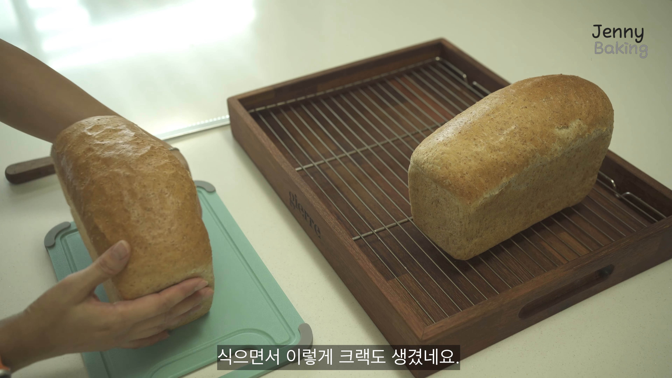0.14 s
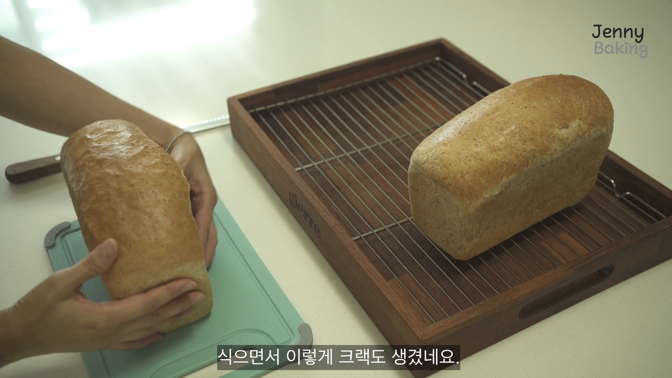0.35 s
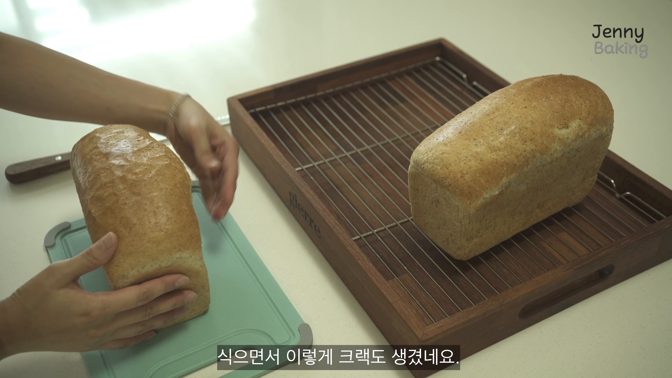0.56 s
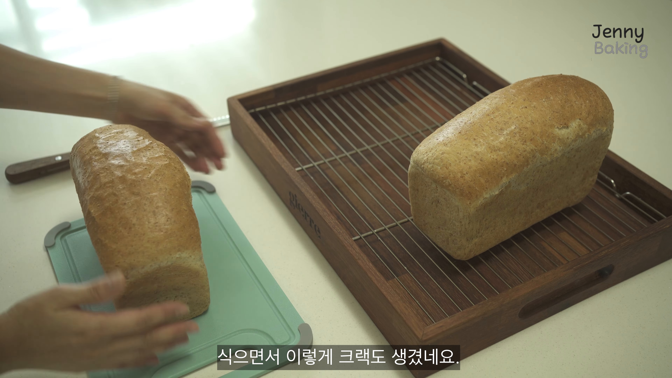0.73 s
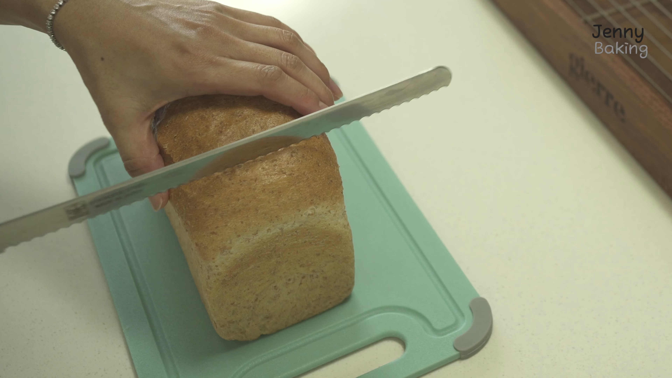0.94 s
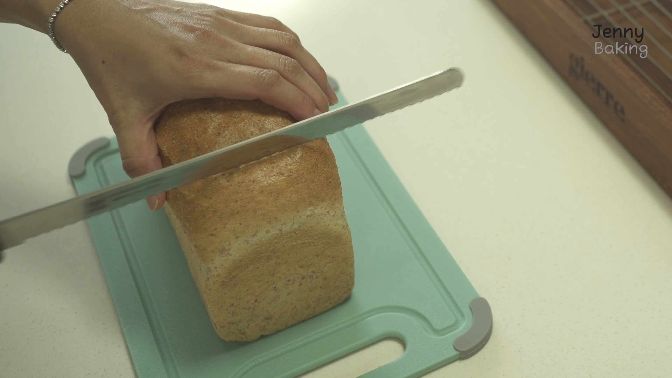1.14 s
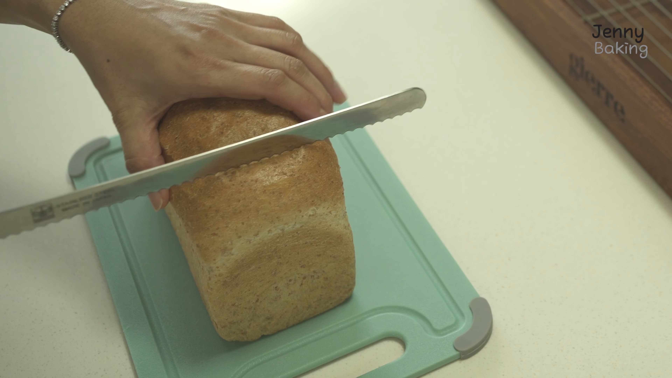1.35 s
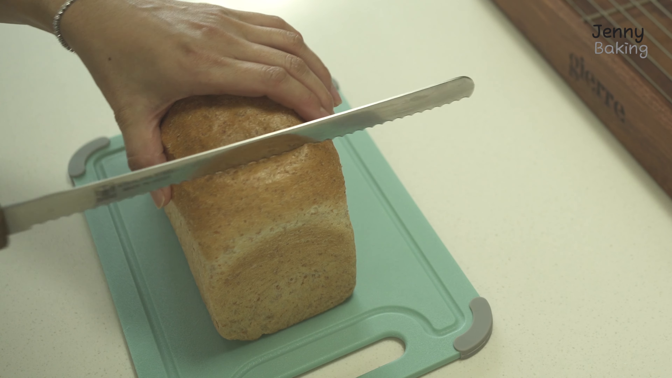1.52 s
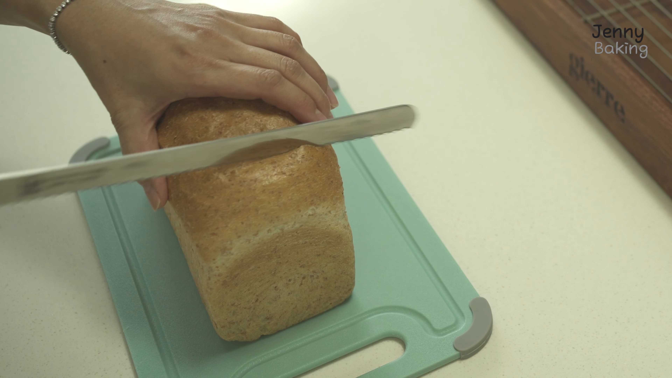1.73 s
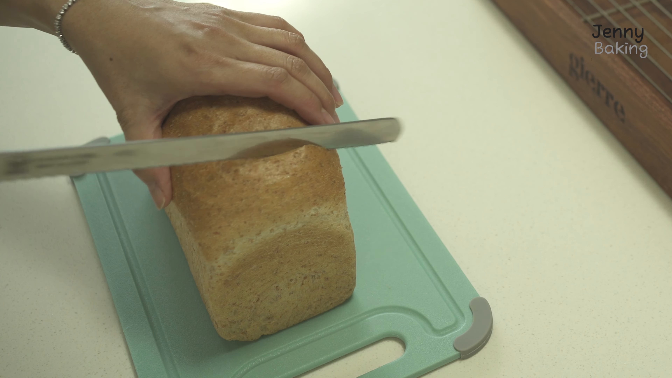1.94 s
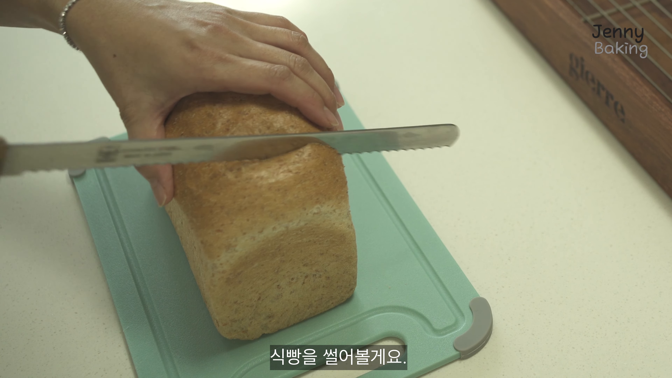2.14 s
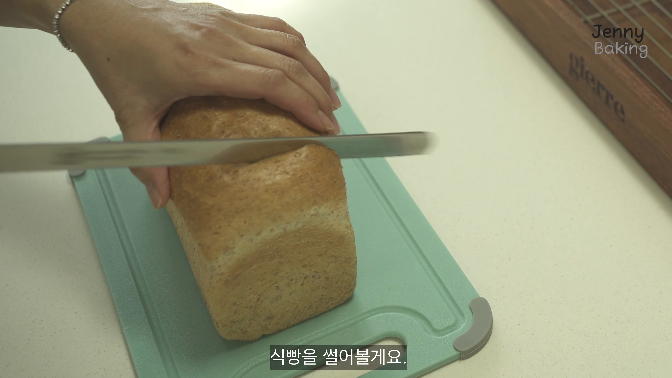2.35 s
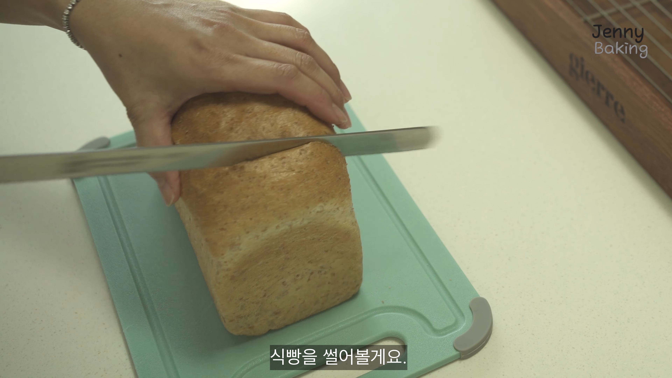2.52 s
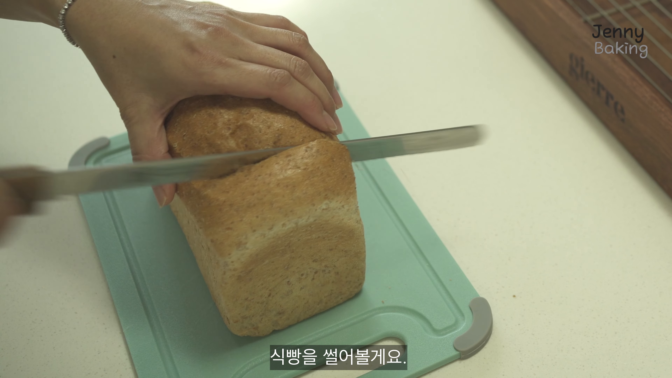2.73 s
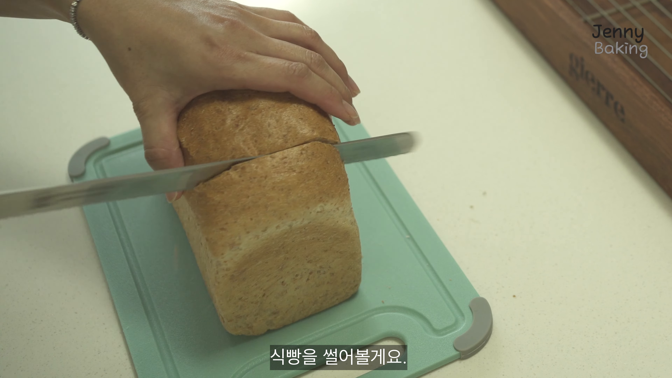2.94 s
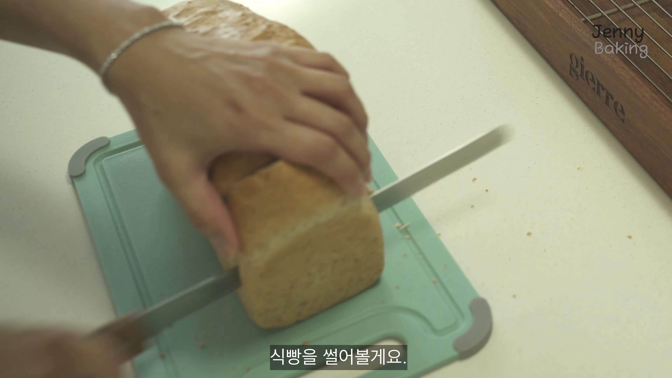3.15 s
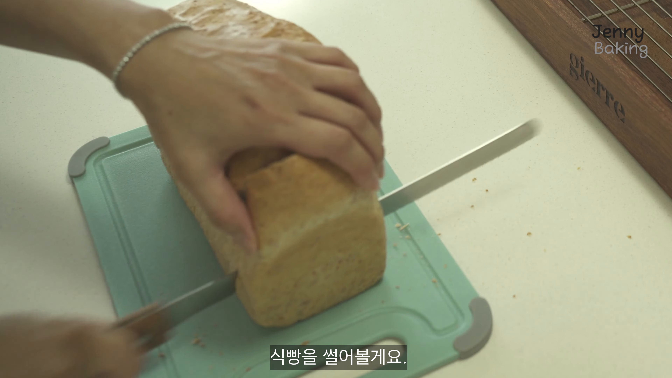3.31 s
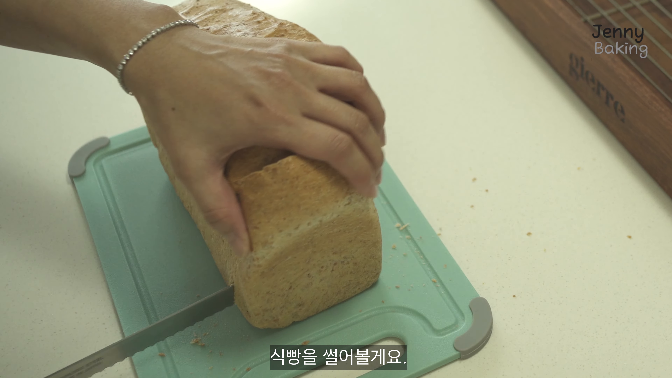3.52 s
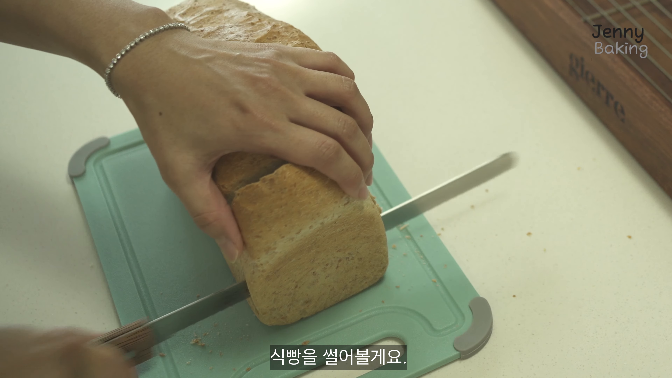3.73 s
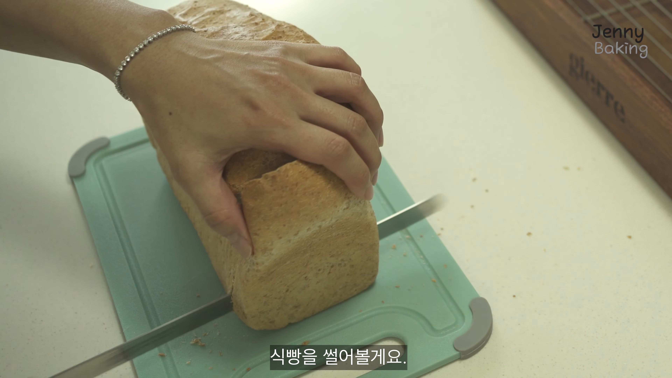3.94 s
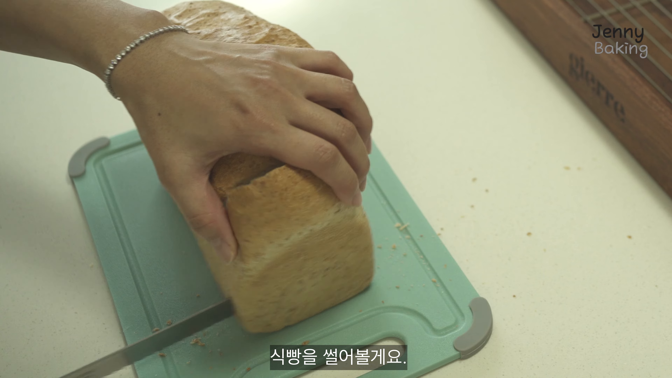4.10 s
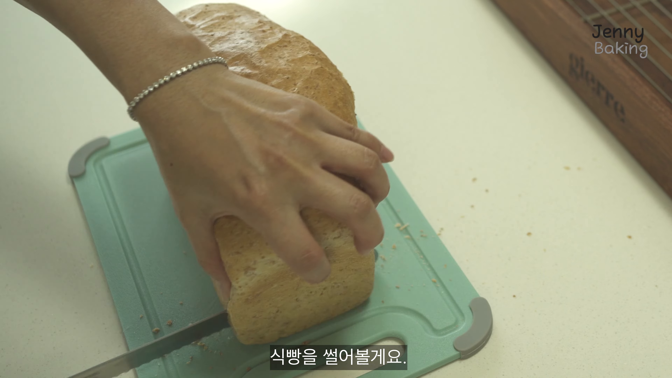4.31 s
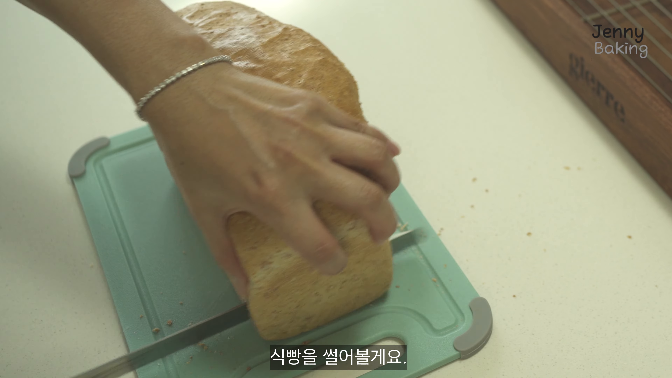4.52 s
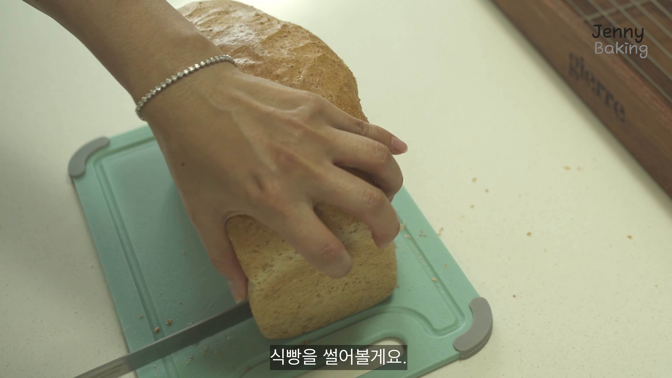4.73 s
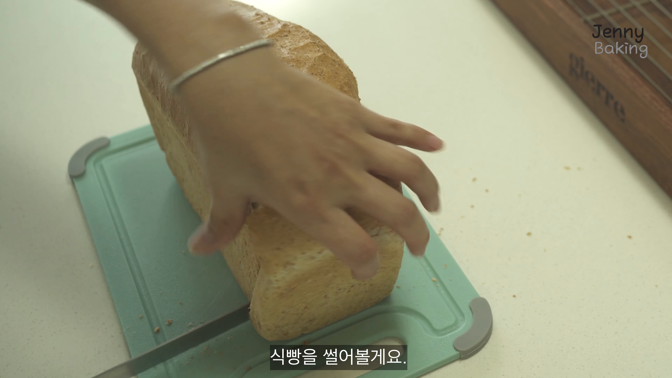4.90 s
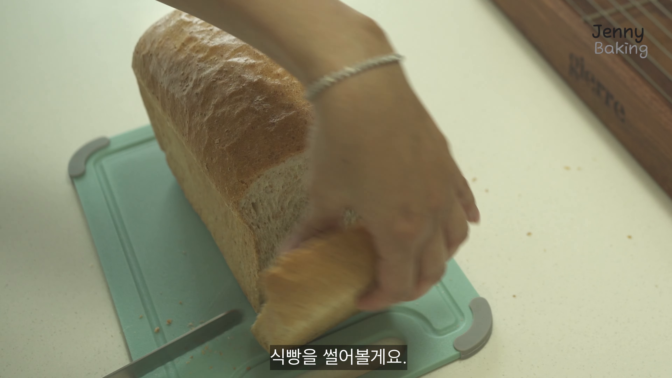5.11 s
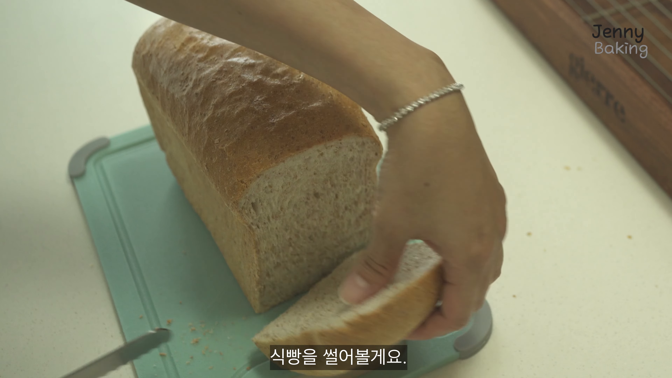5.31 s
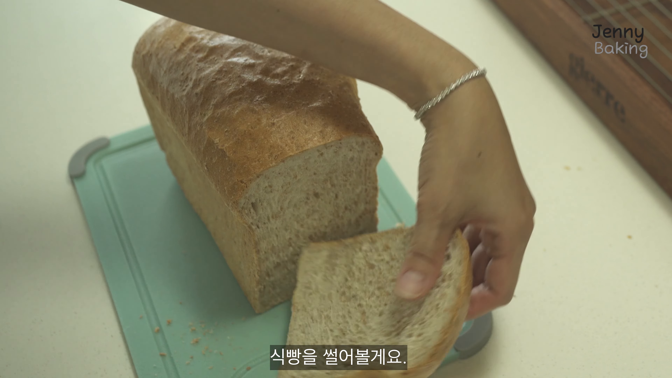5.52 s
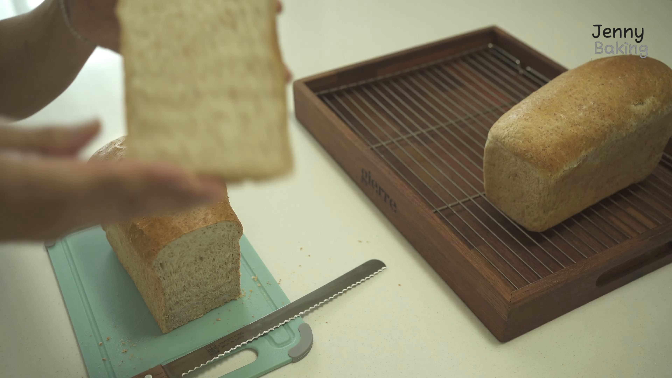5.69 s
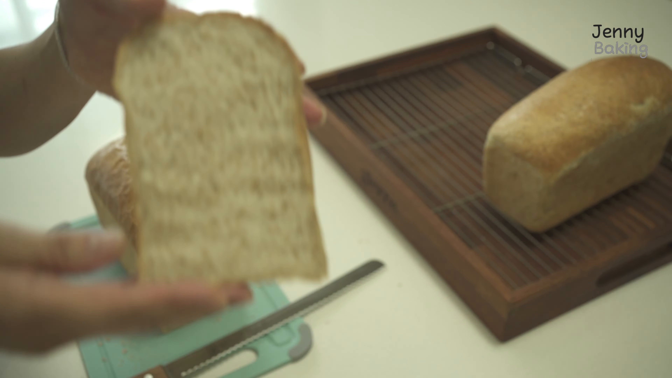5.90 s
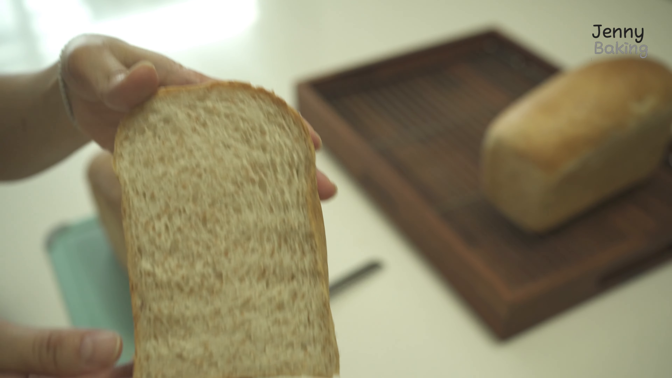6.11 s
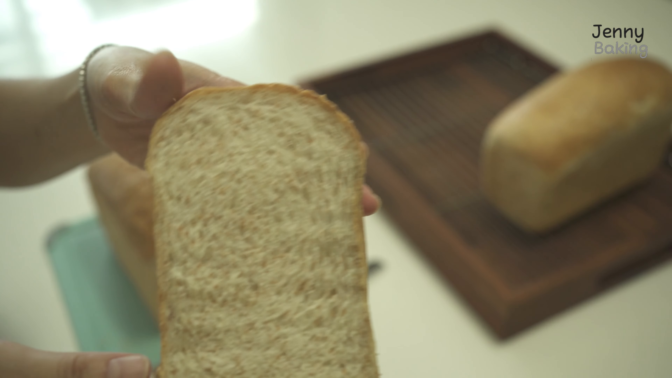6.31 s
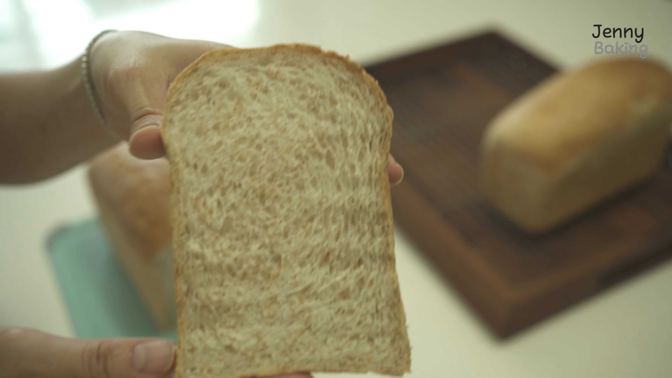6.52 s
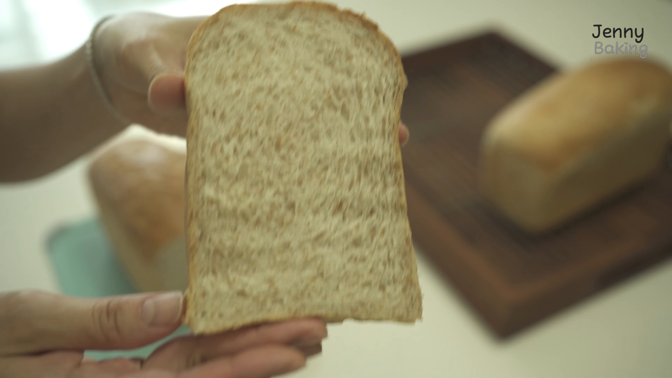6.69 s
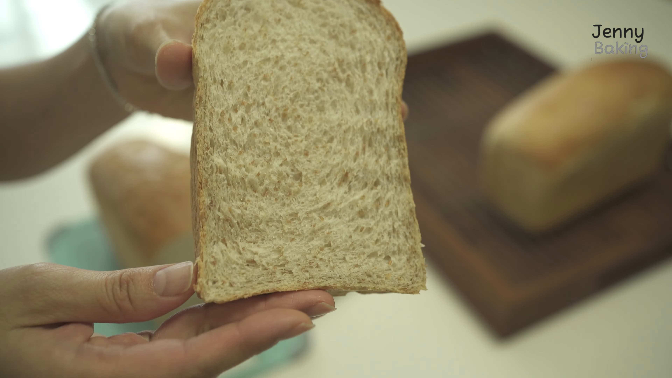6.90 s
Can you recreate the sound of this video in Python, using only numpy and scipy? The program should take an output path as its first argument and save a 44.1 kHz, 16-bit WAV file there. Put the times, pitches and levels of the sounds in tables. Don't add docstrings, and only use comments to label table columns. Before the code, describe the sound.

In a small kitchen with low hum and hiss, hands rustle on crust and a loaf lands on a plastic board with one dull, strong thud. A serrated knife then saws back and forth quickly, raspy and crackling, with sharp crust snaps. Strokes grow longer and duller in the crumb. The background suddenly drops away, faint scrapes finish the cut, then the hum returns with light slice handling. Close microphone, short room tail.

```python
import sys
import numpy as np
from scipy import signal
from scipy.fft import rfft, irfft
from scipy.io import wavfile
from scipy.ndimage import uniform_filter1d

SR = 44100
rng = np.random.default_rng(int(sys.argv[2]) if len(sys.argv) > 2 else 0)


def generate_wav(sig):
    pcm = np.round(np.clip(np.atleast_2d(sig).T, -1, 1) * 32767).astype(np.int16)
    wavfile.write(sys.argv[1], SR, pcm)


def magnitude_from_level(level_db):
    exponent = np.asarray(level_db, float) / 20
    return 10 ** exponent


N = 306495


def rms_one(x):
    return x / np.sqrt(np.mean(x ** 2) + 1e-20)


def add(out, start, x):
    x = x[:N - start]
    out[start:start + len(x)] += x


def drift(size, rate_hz):
    r = np.exp(-2 * np.pi * rate_hz / SR)
    slow = signal.lfilter([1], [1, -2 * r, r * r], rng.standard_normal(size + 4000))
    return rms_one(slow[4000:])


def colour(x, tone, peaks):
    hz = np.linspace(1, SR / 2, 4097)
    tone_hz, tone_db = np.transpose(tone)
    db = np.interp(np.log(hz), np.log(tone_hz), tone_db)
    db = db + sum(peak_db / (1 + (2 * (hz - f) / width) ** 2) for f, width, peak_db in peaks)
    cepstrum = irfft(np.log(magnitude_from_level(db)))
    cepstrum[1:4096] *= 2
    cepstrum[4097:] = 0
    impulse = irfft(np.exp(rfft(cepstrum)))[:4096]
    return signal.fftconvolve(x, impulse)[:len(x)]


def band(x, low_hz, high_hz):
    edges_hz = [low_hz, min(high_hz, .45 * SR)]
    return signal.sosfilt(signal.butter(2, edges_hz, "band", fs=SR, output="sos"), x)


def grains(size, per_s, spread_db):
    sizes = magnitude_from_level(spread_db * np.minimum(rng.exponential(1, size), 4))
    sizes = sizes * rng.choice([-1, 1], size)
    return rms_one(sizes * (rng.random(size) < per_s / SR))


def friction(out, motion, tone, peaks, split_hz, teeth_per_s, uneven_db, bite, crackle, patchy_db):
    start, (body_db, blade_db, crackle_db) = motion
    size = len(body_db)

    speed = magnitude_from_level(np.maximum(.2 * (body_db - np.max(body_db)), -4))
    teeth_passed = np.cumsum(teeth_per_s * speed * magnitude_from_level(uneven_db * drift(size, 70))) / SR
    catch = np.diff(np.floor(teeth_passed), prepend=0) * magnitude_from_level(2.56 * rng.standard_normal(size))

    burst_decay = np.exp(-1 / (.003 * SR))
    share = np.clip(bite, 0, 1)
    bursts = rms_one(signal.lfilter([1], [1, -burst_decay], catch))
    gate = (1 - share + share * bursts) * magnitude_from_level(patchy_db * drift(size, 27))
    tearing = rms_one(rng.standard_normal(size) * gate)
    knock = tearing + share * rms_one(catch)
    crumbs = tearing + crackle * grains(size, 700, 3.4) * gate

    low_hz, high_hz = split_hz
    body = band(colour(knock, tone, peaks), 90, low_hz)
    blade = -band(colour(knock + crumbs, tone, peaks), low_hz, high_hz)
    hiss = -band(band(colour(crumbs, tone, peaks), high_hz, 19000), .8 * high_hz, 19000)
    hiss = hiss + band(hiss, 2700, 6800) * (magnitude_from_level(2.18 * drift(size, 8.1)) - 1)

    mix = magnitude_from_level(body_db) * rms_one(body)
    mix = mix + magnitude_from_level(blade_db) * rms_one(blade)
    mix = mix + magnitude_from_level(crackle_db) * rms_one(hiss)
    add(out, start, mix)


def layers(weight, rub, share, lift_db):
    weight_db, rub_db = 20 * np.log10(weight), 20 * np.log10(rub)
    blade_db = share * rub_db + (1 - share) * weight_db + lift_db
    return weight_db, blade_db, rub_db


def strokes(rows, feel, end_s):
    bite, let_go, keen, share, lift_db, sink_db_per_s, rest_push_db, rest_tear_db = feel
    start = round(rows[0][0] * SR)
    t = np.arange(start, round(end_s * SR)) / SR
    push_power, tear_power = magnitude_from_level(rest_push_db) ** 2, magnitude_from_level(rest_tear_db) ** 2
    for s, length, before, push_db, tear_db in rows:
        phase = np.interp(t, [s, s + before * length, s + length], [0, np.pi / 2, np.pi])
        speed = np.abs(np.sin(phase)) ** np.where(phase < np.pi / 2, bite, let_go)
        push_power = push_power + (magnitude_from_level(push_db) * speed) ** 2
        tear_power = tear_power + (magnitude_from_level(tear_db) * speed ** keen) ** 2
    blade_lift_db = lift_db + sink_db_per_s * (t - t[0])
    return start, layers(np.sqrt(push_power), np.sqrt(tear_power), share, blade_lift_db)


# [t/s, length/s, share before fastest point, push level/dB, tearing level/dB]
CRUST_STROKES = [(.966, .1, 0.11, -51, -55), (1.12, .14, 0.47, -39.5, -44),
                 (1.265, 0.15, 0.5, -37.5, -40.5), (1.435, 0.15, 0.51, -32.5, -40.5),
                 (1.58, .17, 0.37, -37, -40), (1.755, .15, 0.56, -33.5, -44.5),
                 (1.89, .16, 0.39, -43, -42.5), (2.055, .14, 0.64, -30, -40), (2.19, 0.16, .52, -36.5, -39),
                 (2.335, .19, 0.52, -32.5, -37), (2.46, .215, 0.53, -39, -45.5),
                 (2.68, 0.2, 0.41, -35, -34), (2.81, .3, 0.6, -37.5, -42.5)]
CRUMB_STROKES = [
    (3.014, .1, .3, -43, -51.5),
    (3.05, .29, .48, -32.5, -48),
    (3.352, .27, .47, -29, -39.5),
    (3.58, .285, 0.51, -35.5, -43.5),
    (3.865, .28, .45, -37.5, -41),
    (4.145, 0.24, .38, -41, -42.5),
]
BASE_STROKES = [
    (4.375, 0.11, .6, -68, -58),
    (4.428, 0.17, 0.15, -59, -46.5),
    (4.53, .23, .45, -52.5, -48.5),
    (4.7, .21, .36, -55.5, -52.5),
    (4.85, 0.49, 0.17, -56, -53.5),
]
# [bite power, let-go power, tearing power, tearing share of blade, blade lift/dB,
# lift change/(dB/s), resting push/dB, resting tearing/dB]
CRUST_FEEL = (1.13, 1.56, 1.0, 0.93, 4.5, -2.5, -55, -68)
CRUMB_FEEL = (1.0, 1.38, 0.67, 0.62, -5.5, 5.5, -53, -68.5)
BASE_FEEL = (0.78, 2.5, 1.8, 0.58, 5.5, 5, -90.5, -99)
# [f/Hz, level/(dB per Hz)]
CRUST_TONE = [(47, -49.5), (80, -12), (177, -0.5), (242, 1.5), (330, -2), (421, -5.5), (600, -12),
              (1660, -5.5), (2310, -7), (7820, -21), (13900, -26.5), (15900, -26.5)]
CRUMB_TONE = [(47, -53), (80, -22), (119, -2.5), (166, -6.5), (421, 1), (586, -3), (934, -5.5), (2470, -17),
              (8350, -23.5), (10900, -30), (13600, -25), (15900, -38)]
BASE_TONE = [(59, -64), (100, -25), (254, -16.5), (295, -7.5), (372, -17.5), (414, -9.5), (523, -17.5),
             (1570, -5.5), (1830, -12.5), (2160, -7), (3520, -22.5), (7880, -32), (15900, -58)]
# [f/Hz, width/Hz, level/dB]
LOAF_PEAKS = [(205, 17, 1.5), (250, 40, 1), (430, 25, 6.5), (508, 22, 5), (1630, 550, 4), (4930, 200, 2),
              (8300, 1400, 5.5)]
CUT_LOAF_PEAKS = [(443, 45, 1.96), (513.6, 31, 4.8), (950, 29, 1.2), (2950, 1000, 5), (8040, 500, 4),
                  (13300, 1500, .5)]
BLADE_PEAKS = [(420, 73, 4.5), (746, 51, 3.8), (1060, 30, 4.8), (1613, 170, 8.7), (2090, 200, 4.9),
               (3000, 340, 4.9), (3320, 120, 7.5), (3670, 72, 2.6)]
CRUST_END_S, CRUMB_END_S, BASE_END_S = 3.011, 4.349, 5.45


def knife():
    out = np.zeros(N)
    friction(out, strokes(CRUST_STROKES, CRUST_FEEL, CRUST_END_S), CRUST_TONE, LOAF_PEAKS, (750, 2200),
             teeth_per_s=210, uneven_db=2.5, bite=.62, crackle=.85, patchy_db=1.6)
    friction(out, strokes(CRUMB_STROKES, CRUMB_FEEL, CRUMB_END_S), CRUMB_TONE, CUT_LOAF_PEAKS, (1100, 2300),
             teeth_per_s=125, uneven_db=1.2, bite=.58, crackle=.5, patchy_db=.8)
    friction(out, strokes(BASE_STROKES, BASE_FEEL, BASE_END_S), BASE_TONE, BLADE_PEAKS, (800, 2600),
             teeth_per_s=180, uneven_db=2.5, bite=.35, crackle=.35, patchy_db=.8)
    return out


# [t/s, snap peak level/dB, knock peak level/dB]
CRACKS = [(1.133, -34, -30.5), (1.1628, -47, -39), (1.3091, -39, -24), (1.3329, -25, -25),
          (1.4685, -34, -32), (1.5, -34, -28), (1.8094, -31, -23.5), (1.9342, -24, -43),
          (1.949, -24.5, -39), (2.08, -32, -32), (2.1033, -23, -31), (2.1586, -17, -32), (2.2656, -25, -32),
          (2.315, -24, -33), (2.3587, -29, -35), (2.3839, -31.5, -42.5), (2.411, -28, -24.5),
          (2.4232, -13.5, -14.5), (2.7081, -36, -28.5), (2.745, -20, -22.5), (2.785, -12, -33.5),
          (3.1814, -38, -35), (3.3631, -24.5, -27.5), (3.409, -22, -26.5), (3.5242, -27, -20),
          (3.5515, -21.5, -25), (3.68, -19, -22), (3.7832, -33, -25.5), (3.8981, -27, -26.5),
          (3.9514, -39, -23)]
TICKS = [(0.4278, -31.5, -43), (0.4718, -21, -15), (0.4823, -22, -17.5), (0.5618, -29, -32),
         (0.8333, -34, -58), (0.9762, -42, -51), (4.4417, -43, -45), (4.7301, -57, -48), (5.1971, -68, -54),
         (5.5623, -61.5, -59), (5.7229, -36, -45.5), (6.489, -39.5, -39.5), (6.551, -51, -30),
         (6.5877, -52, -30.5), (6.5909, -49.5, -38), (6.602, -54, -34), (6.6142, -44, -34),
         (6.6173, -50, -43), (6.6325, -33.5, -26.5), (6.675, -44, -39), (6.693, -54, -35),
         (6.704, -50, -47)]


def cracks():
    out, t = np.zeros(N), np.arange(700) / SR
    rows = CRACKS + TICKS
    noise = rng.standard_normal((len(rows), len(t)))
    for (s, snap_db, knock_db), tail in zip(rows, noise):
        snap = band(.5 * tail * np.exp(-t / .0012) - (t == 0) * 2, 2000, 13000)
        knock = .6 * tail * np.exp(-t / .002) - (t == 0) * 3
        knock = band(band(knock, 400, 2600), 400, 2600)
        both = magnitude_from_level(snap_db - 2.5) * snap / np.max(np.abs(snap))
        both = both + magnitude_from_level(knock_db + .5) * knock / np.max(np.abs(knock))
        add(out, round(s * SR), both)
    return out


# [t/s, peak level/dB]
LANDING = [
    (0.129, -26),
    (0.313, -36.5),
    (0.472, -1.5),
    (0.481, -27.5),
    (0.503, -17.5),
    (0.524, -17),
]
# [f/Hz, level/dB, T60/s]
BOARD_MODES = [
    (182, -14.5, .1),
    (210, 3, 0.028),
    (420, -2.5, 0.028),
    (520, -9, 0.032),
    (693, -15, 0.08),
    (1145, -14.5, 0.13),
]


def landing():
    out = np.zeros(N)
    at = [round(s * SR) for s, _ in LANDING]
    luck = rng.standard_normal((len(at), len(BOARD_MODES)))
    contact = np.hanning(36) / 18
    for (hz, level_db, t60_s), chance in zip(BOARD_MODES, luck.T):
        clicks = np.full(N // 4, 1e-18)
        clicks[at] = -magnitude_from_level(np.array(LANDING)[:, 1] + level_db - 9.5 + 0.73 * chance)
        r, w = magnitude_from_level(-60 / (t60_s * SR)), 2 * np.pi * hz / SR
        add(out, 0, signal.lfilter(np.sin(w) * contact, [1, -2 * r * np.cos(w), r * r], clicks))
    return band(out, 160, 6000)


WEIGHT_FADE, RUB_SHARE, RUB_DB, HAND_REST_DB = .8, .6, 1.5, -99


def touches(rows, end_s):
    start = round(rows[0][0] * SR)
    t = np.arange(start, min(round(end_s * SR), N)) / SR
    weight = rustle = magnitude_from_level(HAND_REST_DB)
    for s, rise, fade, weight_db, rustle_db in rows:
        up = np.clip((t - s) / rise, 0, 1)
        after = np.maximum(t - s - rise, 0)
        weight = weight + up * magnitude_from_level(weight_db - WEIGHT_FADE * fade * after)
        rustle = rustle + up * magnitude_from_level(rustle_db - fade * after)
    return start, layers(weight, rustle, RUB_SHARE, RUB_DB)


# [t/s, rise/s, fade/(dB/s), weight level/dB, rustle level/dB]
PLACING = [
    (.127, 0.012, 159, -42, -43.5),
    (.28, .14, 89.5, -58.5, -55.5),
    (.445, .022, 300, -58, -51),
    (.468, 0.02, 232, -33.5, -38),
    (.55, 0.033, 69, -53, -69),
]
TIPPING = [
    (5.468, 0.0069, 39.8, -75, -86.5),
    (5.556, .006, 260, -71.5, -84),
]
LIFTING = [
    (5.69, .006, 22, -59.5, -52.5),
    (6.35, .2, 62, -57, -65),
    (6.76, .17, 25, -59.5, -92),
]
# [f/Hz, width/Hz, level/dB]
HAND_TONE = [(47, -46), (80, -4.5), (152, 1), (270, -2.5), (394, -10), (1190, -13), (1450, -16.5),
             (1660, -10.5), (8350, -21.5), (15900, -38)]
SKIN_PEAKS = [(214, 17, 3), (534, 50, 3.6), (8580, 900, 4)]


def hands():
    out = np.zeros(N)
    friction(out, touches(PLACING, 0.98), HAND_TONE, SKIN_PEAKS, (750, 2250),
             teeth_per_s=52, uneven_db=2.0, bite=.2, crackle=0.32, patchy_db=3.26)
    friction(out, touches(TIPPING, 5.68), HAND_TONE, SKIN_PEAKS, (750, 2250),
             teeth_per_s=90, uneven_db=3.0, bite=.3, crackle=.3, patchy_db=2.5)
    friction(out, touches(LIFTING, N / SR), HAND_TONE, SKIN_PEAKS, (750, 2250),
             teeth_per_s=82, uneven_db=-2.0, bite=0.059, crackle=0.067, patchy_db=1.3)
    return out


KITCHEN_T60_S, KITCHEN_DB, WALL_CUT_HZ = .2, -13, 9000


def kitchen(x):
    t = np.arange(round(.5 * SR)) / SR
    tail = rng.standard_normal(len(t)) * magnitude_from_level(-60 * t / KITCHEN_T60_S) * (t > .006)
    tail = band(tail, 180, WALL_CUT_HZ)
    return magnitude_from_level(KITCHEN_DB) * signal.fftconvolve(x, tail / np.sqrt(np.sum(tail ** 2)))[:N]


# [t/s, bass level/dB, treble level/dB]
GAIN = [
    (0, 0, 6),
    (1.11, 1.5, 5),
    (4.348, -1, 13),
    (4.356, -18.5, -29.5),
    (5.682, -26.5, -20.5),
    (5.69, -1, 8.5),
    (6.95, -1, 1.5),
]


def gain_db():
    s, bass_db, treble_db = np.transpose(GAIN)
    t = np.arange(N) / SR
    return np.interp(t, s, bass_db), np.interp(t, s, treble_db)


# [f/Hz, level/(dB per Hz)]
HUM_TONE = [(35, -34), (60, -13), (212, -3.5), (322, -8), (362, -6.5), (407, -10.5), (551, -10.5),
            (1010, -16.5), (1430, -19), (1730, -24), (8070, -34), (15900, -40)]
# [middle t/s, length/s, level/dB]
GUSTS = [(.18, 0.18, -57), (.52, .2, -45), (1.491, .3, -55), (1.991, 0.2, -56), (2.51, 0.36, -60),
         (3.12, 0.55, -57), (3.803, 0.6, -60), (5.169, .15, -53), (5.9, 0.28, -51), (6.12, 0.49, -52.5),
         (6.721, .2, -59)]
HUM_DB, RUMBLE_DB, RUMBLE_WANDER_DB, QUIET_RUMBLE_DB = -52.5, -64, 1.5, 1


def background():
    hum = magnitude_from_level(HUM_DB - 2.5) * rms_one(colour(rng.standard_normal(N), HUM_TONE, []))
    bass = band(hum, 40, 2100)
    bass_db, treble_db = gain_db()
    t = np.arange(N) / SR
    air = magnitude_from_level(RUMBLE_DB + RUMBLE_WANDER_DB * drift(N, 1.2) + QUIET_RUMBLE_DB * (bass_db < -10))
    air = air + sum(magnitude_from_level(db) * np.exp(-8 * ((t - s) / length) ** 2) for s, length, db in GUSTS)
    rumble = band(rng.standard_normal(N), 24, 41)
    steady = rumble / uniform_filter1d(rumble ** 2, size=6000) ** .35
    return magnitude_from_level(bass_db) * (bass + air * rms_one(steady)) + magnitude_from_level(treble_db) * (hum - bass)


def scene():
    near = knife() + hands() + cracks() + landing()
    drop = round(GAIN[3][0] * SR)
    before = near * (np.arange(N) < drop)
    wet = kitchen(before) * magnitude_from_level(gain_db()[0]) + kitchen(near - before)
    return (near + wet + background())[None]


def roll_off(x):
    return signal.sosfilt(signal.butter(12, 16020, fs=SR, output="sos"), x)


CUTOFF_HZ = 16060


def record(dry):
    low_pass = signal.cheby2(30, 80, CUTOFF_HZ, fs=SR, output="sos")
    mix = signal.sosfilt(low_pass, dry)
    return roll_off(mix)


dry = scene()
out = record(dry)
generate_wav(out)
```